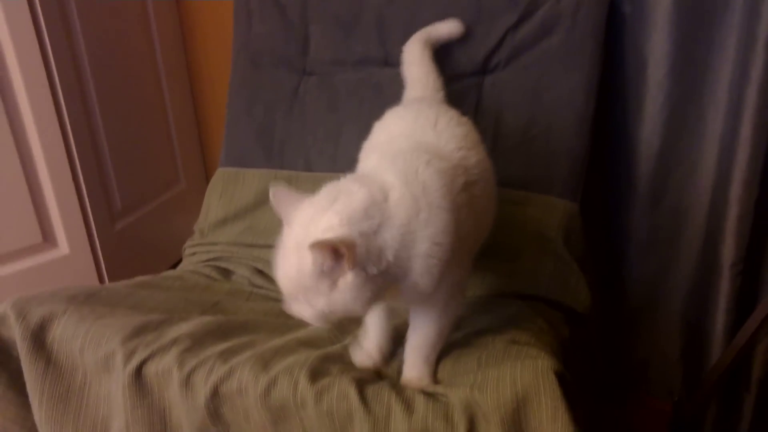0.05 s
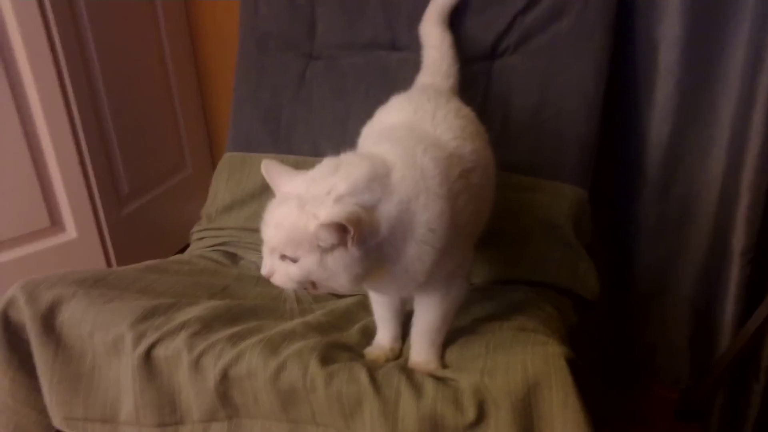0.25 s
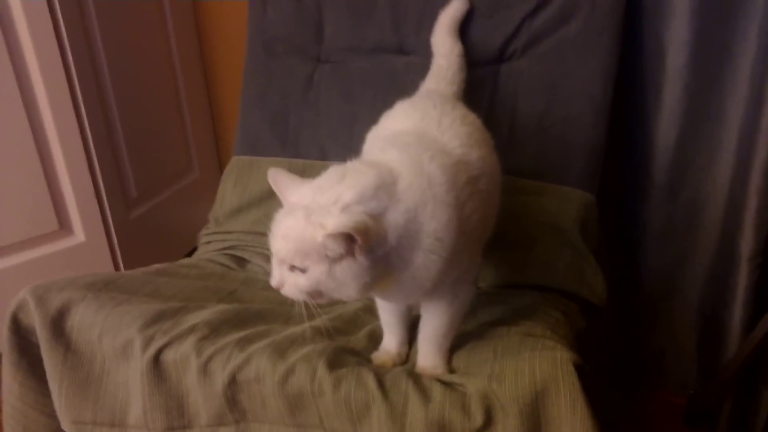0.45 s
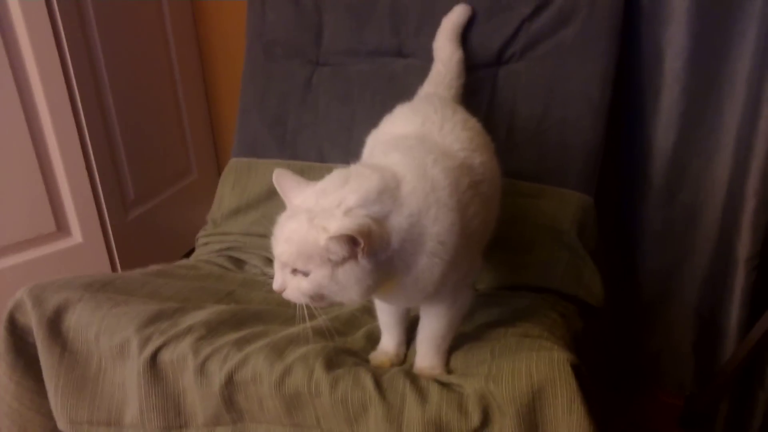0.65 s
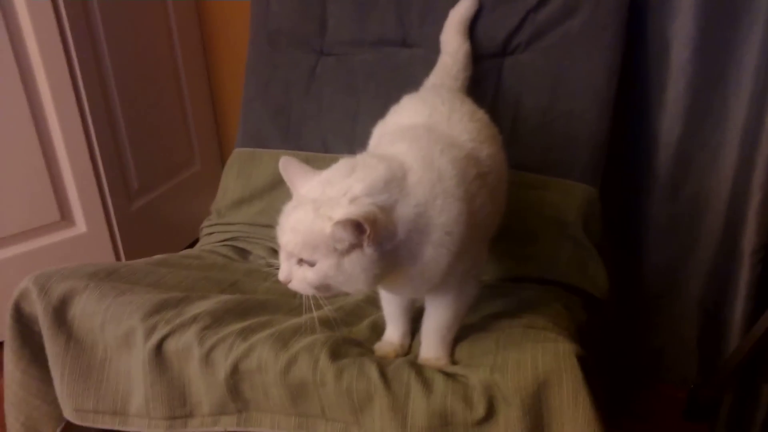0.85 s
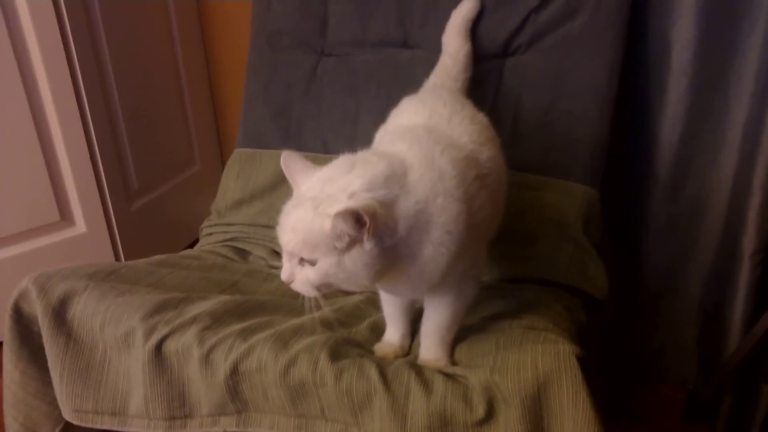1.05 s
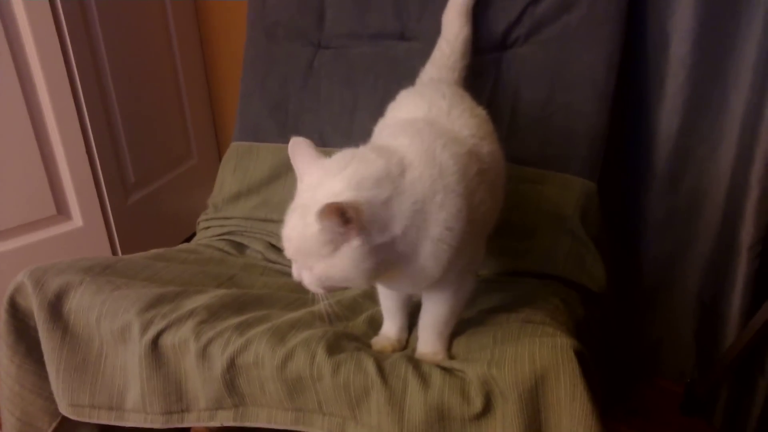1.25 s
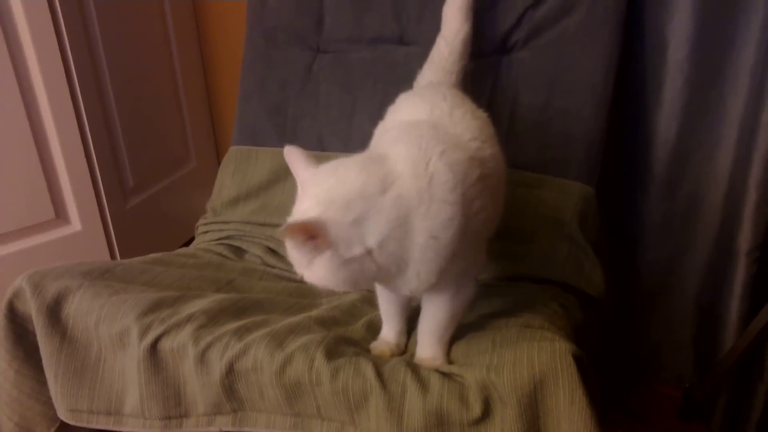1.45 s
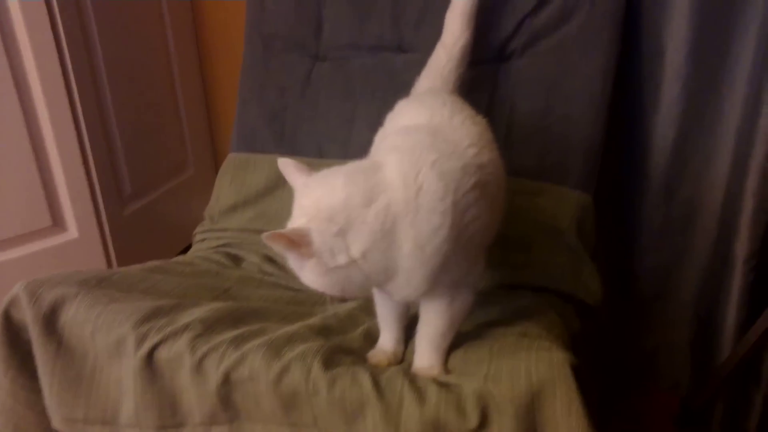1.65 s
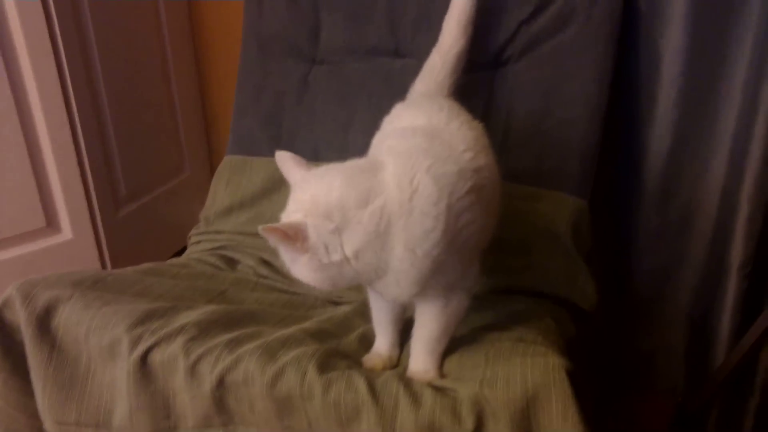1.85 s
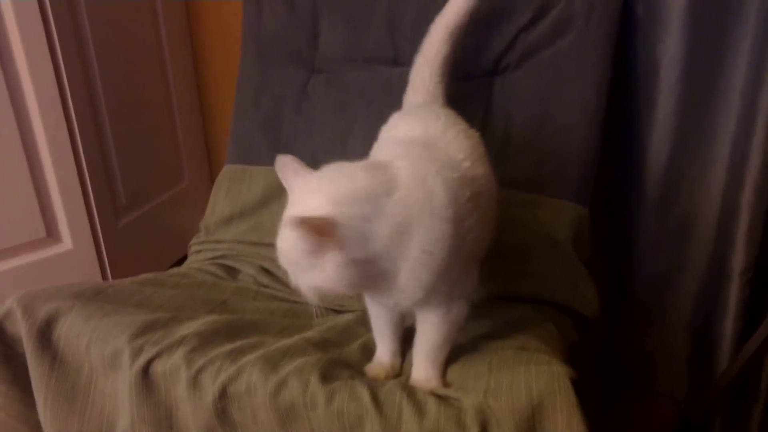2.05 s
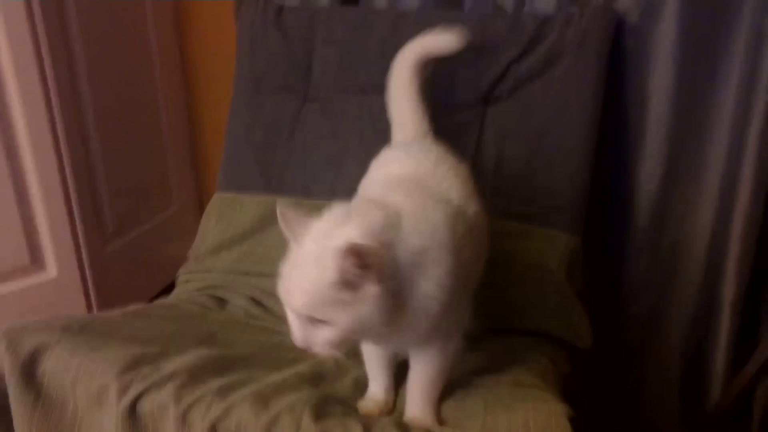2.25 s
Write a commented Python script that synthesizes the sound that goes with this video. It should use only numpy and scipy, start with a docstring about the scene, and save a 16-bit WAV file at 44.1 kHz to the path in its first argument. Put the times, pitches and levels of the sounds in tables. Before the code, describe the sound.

One piercing, raspy cat meow at close range in a small room, sinking away into faint hiss.

```python
"""Hiss and a thin electrical whine open the scene; almost at once a cat gives one very loud, close meow.
The voice is a stack of harmonics that rises cleanly, breaks into a rough, throbbing screech of noise puffs
and scattered cycles, snaps back to a clear tone and sinks as the mouth closes.
Moving throat resonances shape it and a small room rings after it; faint brief tones follow.
A limiter and soft clipping overload the screech, and the extreme treble is cut."""
import sys
import numpy as np
from scipy import signal
from scipy.fft import rfft, irfft
from scipy.io import wavfile
from scipy.ndimage import uniform_filter1d

SR = 44100
rng = np.random.default_rng(int(sys.argv[2]) if len(sys.argv) > 2 else 0)


def store_pcm(level_fs):
    """Save levels as 16-bit WAV."""
    pcm = np.round(np.clip(level_fs, -1, 1) * 32767).astype(np.int16)
    wavfile.write(sys.argv[1], SR, np.atleast_2d(pcm).T)


N = 101429
TIME = np.arange(N) / SR

# pitch glide of the meow: t/s, f/Hz
MEOW_PITCH = [(.11, 395), (.16, 433.2), (.2, 520), (.262, 650), (.284, 679.8), (.305, 738.9), (.328, 1047),
              (.35, 1062), (.372, 972), (.44, 960.6), (.465, 859.7), (.51, 817.8), (.555, 767.5),
              (.662, 754.8), (.669, 665), (.72, 662), (.78, 630.2), (.89, 570.9), (.975, 538),
              (1.01, 478.8), (1.06, 415.3)]
# vocal effort, the loudness of the call: t/s, level/dB
VOCAL_EFFORT = [(.1, -59), (.12, -50), (.16, -47.5), (.205, -27), (.24, -22), (.295, -10.5), (.315, -12.5),
                (.35, -7.5), (.38, -9), (.415, -9), (.5, -10.5), (.54, -11.5), (.575, -13.5), (.655, -14),
                (.685, -18), (.719, -16.5), (.729, -10.5), (.75, -19), (.81, -20), (.87, -23.5),
                (.985, -28.5), (1.02, -35), (1.058, -48)]
# roughness of the voice: t/s, roughness/0-1, throb depth/0-1
ROUGHNESS = [(.12, 0.31, 0.2), (.2, .1, 0.47), (.298, 0.06, 0.26), (.315, 0.84, 0.4), (.345, 0.79, 0.43),
             (.41, 0.66, 0.2), (.49, 0.66, 0.23), (.55, 0.45, .8), (.662, .5, 0.97), (.67, 0.05, 0.24),
             (.97, 0.02, 0), (1.03, 0.34, 0.3)]
# four throat resonances as the mouth moves: t/s, four centres f/Hz, four peak heights level/dB
MOUTH_RESONANCES = [(.13, 950, 2000, 4770, 7000, 13, 2.5, 16, 2),
                    (.21, 1800, 3240, 5300, 6840, 13.3, 4.3, 8.1, 6),
                    (.265, 2404, 3730, 5500, 7300, 20, 24, 14.5, 6),
                    (.295, 2170, 2883, 4200, 7346, 9.7, 12, 12, 5),
                    (.33, 2150, 3750, 4430, 7350, 17.4, 6.1, 5.4, 2.3),
                    (.42, 1930, 3700, 5700, 7400, 14.4, 9.5, 4.6, 6.1),
                    (.5, 1650, 3191, 5400, 8400, 23.9, 11, 6.7, 13),
                    (.58, 1520, 3050, 5020, 8550, 19.4, 1.76, 7, 10),
                    (.66, 1510, 3210, 5300, 8550, 21, 5.73, 11, 14.5),
                    (.675, 1400, 3203, 5300, 8600, 4.45, 18, 14, 17),
                    (.735, 1348, 3290, 5150, 8740, 11, 15.2, 9.42, 6.8),
                    (.81, 1219, 3185, 5050, 8216, 12.2, 13.9, 8.3, 13),
                    (.89, 1440, 3083, 5400, 8220, 19.4, 28, 8.7, 21.2),
                    (.98, 1360, 3024, 5300, 7860, 21, 2.9, 18.6, 8.1),
                    (1.04, 1120, 2794, 5250, 8200, 14, 6, 23, 4.9)]
# half-widths of those four resonances: f/Hz
RESONANCE_WIDTHS = (215, 261, 297.7, 521.3)
# colour of the clear voice under the resonances: f/Hz, relative level/dB
FOLD_COLOUR = [(300, -22), (600, -20.5), (900, -4.5), (1200, -4.5), (2200, 3), (4000, -4.5), (6000, -10.5),
               (8000, -20), (10000, -28), (12000, -41.5), (16000, -41)]
# colour of the rasp under the resonances: f/Hz, relative level/dB
RASP_COLOUR = [(200, -48), (550, -28.5), (850, -4.5), (1300, -5.5), (2300, 4.5), (4400, 3), (6200, -0.5),
               (8000, -17.5), (10000, -24), (12000, -31), (16000, -34)]
# ring of the room, time to fall 60 dB: f/Hz, t60/s
ROOM_DECAY = [(200, .4), (1400, 0.31), (3000, 0.34), (6000, .28), (14000, .18)]
# colour of hiss and room tone: f/Hz, relative level/dB per Hz
HISS_COLOUR = [(18, -57), (30, -31), (49, -28), (249, -5.5), (307, -8.5), (996, -13.5), (1140, -15),
               (1330, -15), (2620, -20), (3680, -18), (3980, -13.5), (5040, -12.5), (6050, -8.5),
               (6540, -15), (9190, -20.5), (9940, -18.5), (15500, -26)]
# electrical whine: f/Hz, rms level/dB
WHINE_TONES = [(258, -76), (1124, -73), (1444, -76.5), (3238, -81), (3487, -77.5), (3735, -76), (3990, -78),
               (4111, -61), (4233, -75.5), (4483, -66), (5975, -75), (6165.5, -56), (8221, -77.5),
               (9959, -76), (10277, -75), (12333, -74.5), (14390, -84)]
# brief background tones: start t/s, length/s, f/Hz, rms level at the crest/dB
BRIEF_TONES = [(1.367, .11, 542, -63.5), (1.69, .15, 3140, -72.5), (1.875, 0.075, 2390, -73.5),
               (1.95, 0.075, 545, -63)]

JITTER, JITTER_RATE_HZ = 0.0179, 120  # rms fraction of pitch scattered at full roughness
WAVER, WAVER_RATE_HZ = 0.0043, 50  # rms fraction of pitch, unsteady throughout the call
SLIP_TURNS, SLIP_RATE_HZ = 0.098, 378  # cycles come early or late by this rms at full roughness
THROB_HZ, THROB_SCATTER = 59.9, 0.2017  # mean beat rate, rms fraction it wanders
RASP_DB = 1  # rasp at full roughness, against the clear tone at none
SOFT_BELOW_DB, SOFT_BASS, SOFT_HZ = -16, 0.96, 750  # dB of bass gained per dB of effort below the threshold
ROOM_DB, EARLY_DB, EARLY_S = -7, -5, .016  # tail and reflections against the direct sound; early span
HISS_DB = -57.5
WHINE_DRIFT_HZ = 2.5  # rms
LIMIT_RMS, REACT_S = 0.38, .004  # limiter level and averaging time
CEILING, KNEE = 0.67, 11  # soft clipping: peak level and hardness of the bend
EDGE_HZ = 15730  # top of the recorded band


def meow():
    """One call: roughness scatters the cycles, trades tone for rasp and comes with a throb."""
    (pitch,), (effort,), (rough, beat) = curve(MEOW_PITCH), curve(VOCAL_EFFORT), curve(ROUGHNESS)
    rough = np.clip(rough, 0, 1)
    softness = np.maximum(SOFT_BELOW_DB - effort, 0)

    jitter = JITTER * rough * wander(JITTER_RATE_HZ)
    waver = WAVER * wander(WAVER_RATE_HZ)
    turns = np.cumsum(pitch * (1 + jitter + waver)) / SR
    turns += SLIP_TURNS * rough * wander(SLIP_RATE_HZ)

    throb_hz = THROB_HZ * (1 + THROB_SCATTER * wander(30))
    throb = 1 + beat * np.sin(2 * np.pi * np.cumsum(throb_hz) / SR)

    tone = np.sqrt(1 - rough ** 2) * throb * throat(folds(turns), FOLD_COLOUR, softness)
    rasp = amp(RASP_DB) * rough * throat(puffs(turns), RASP_COLOUR, softness)
    sounding = (TIME > VOCAL_EFFORT[0][0]) * (TIME < VOCAL_EFFORT[-1][0])
    return (tone + rasp) * amp(effort) * sounding


def folds(turns, count=20):
    """The vibrating vocal folds: equal harmonics of the pitch, each with a random phase."""
    return sum(np.cos(2 * np.pi * (k * turns + rng.random())) for k in range(1, count + 1))


def puffs(turns, depth=0.49):
    """Turbulent breath: noise that swells once in each cycle of the folds."""
    return (1 + depth * np.cos(2 * np.pi * turns)) * rng.standard_normal(N)


def throat(x, colour, softness):
    """Four moving resonances shape a source at steady power; a soft voice is rounder."""
    hz, t, z = signal.stft(x, SR, nperseg=512, noverlap=448)
    hz = hz[:, None]
    mouth = curve(MOUTH_RESONANCES, t)
    peaks = zip(mouth[:4], RESONANCE_WIDTHS, mouth[4:])
    lift_db = sum(db / (1 + ((hz - centre) / width) ** 2) for centre, width, db in peaks)
    bass_db = SOFT_BASS * np.interp(t, TIME, softness) / (1 + (hz / SOFT_HZ) ** 2)
    shaped = z * amp(spectrum(colour, hz) + lift_db + bass_db)
    shaped = shaped / np.linalg.norm(shaped, axis=0)  # even power in every frame
    return unit(signal.istft(shaped, nperseg=512, noverlap=448)[1][:N])


def room(x):
    """The direct sound, a few early reflections, then a short diffuse tail that decays by frequency."""
    hz, t, z = signal.stft(rng.standard_normal(SR // 2), SR, nperseg=256)
    decay = amp(-60 * t / spectrum(ROOM_DECAY, hz)[:, None])
    tail = signal.istft(z * decay, nperseg=256)[1]
    tail *= np.minimum(TIME[:len(tail)] / EARLY_S, 1)  # builds up behind the reflections
    response = amp(ROOM_DB) * tail / np.linalg.norm(tail)

    early = (rng.uniform(.1, 1, size=8) * EARLY_S * SR).astype(int)
    response[early] += amp(EARLY_DB) * rng.choice([-1, 1], len(early)) / np.sqrt(len(early))
    response[0] += 1  # direct sound
    return signal.fftconvolve(x, response / np.linalg.norm(response))[:N]


def whine():
    """Thin electrical tones, each drifting slightly in pitch."""
    total = np.zeros(N)
    for hz, db in WHINE_TONES:
        drifting_hz = hz + WHINE_DRIFT_HZ * wander(12)
        total += amp(db) * unit(np.sin(2 * np.pi * np.cumsum(drifting_hz) / SR))
    return total


def hiss():
    """Room tone and microphone hiss: steady noise, coloured by frequency."""
    colour = amp(spectrum(HISS_COLOUR, np.fft.rfftfreq(N, 1 / SR)))
    return amp(HISS_DB) * unit(irfft(rfft(rng.standard_normal(N)) * colour, N))


def hums():
    """Faint brief sine tones that swell and fade."""
    total = np.zeros(N)
    for start, length, hz, db in BRIEF_TONES:
        swell = np.sqrt(2 * np.sin(np.pi * np.clip((TIME - start) / length, 0, 1)))
        total += amp(db) * swell * np.sin(2 * np.pi * hz * TIME)
    return total


def amp(db):
    """Decibels to gain."""
    return 10 ** (np.asarray(db) / 20)


def unit(x):
    """Scales to rms 1."""
    return x / np.sqrt(np.mean(x ** 2) + 1e-20)


def curve(table, t=TIME):
    """Each column of a table of timed points, joined by straight lines."""
    s, *columns = np.transpose(table)
    return [np.interp(t, s, c) for c in columns]


def spectrum(table, hz):
    """Reads (f/Hz, value) points on a log-frequency axis."""
    f, value = np.transpose(table)
    return np.interp(np.log(hz + 1), np.log(f + 1), value)


def wander(rate_hz):
    """Random motion of rms 1: noise rolled off steeply above the rate."""
    hz = np.fft.rfftfreq(N, 1 / SR)
    return unit(irfft(rfft(rng.standard_normal(N)) / (1 + (hz / rate_hz) ** 4), N))


def scene():
    """The cat in its room over the quiet background."""
    return (room(meow()) + hiss() + whine() + hums())[None]


def record(dry):
    """A quick limiter holds the loudest swells, the input stage rounds off peaks, then the band limit."""
    size = max(round(REACT_S * SR), 1)
    level = np.sqrt(abs(uniform_filter1d(dry ** 2, size)))
    gain = uniform_filter1d(LIMIT_RMS / np.maximum(level, LIMIT_RMS), size)

    fine = signal.resample_poly(dry * gain, 2, 1, axis=1)  # oversampled to tame clipping aliases
    clipped = fine / (1 + abs(fine / CEILING) ** KNEE) ** (1 / KNEE)
    rounded = signal.resample_poly(clipped, 1, 2, axis=1)

    lowpass = signal.firwin(511, EDGE_HZ, window=("kaiser", 9), fs=SR)
    return signal.oaconvolve(rounded, lowpass[None], "same")


dry = scene()
out = record(dry)
store_pcm(out)
```